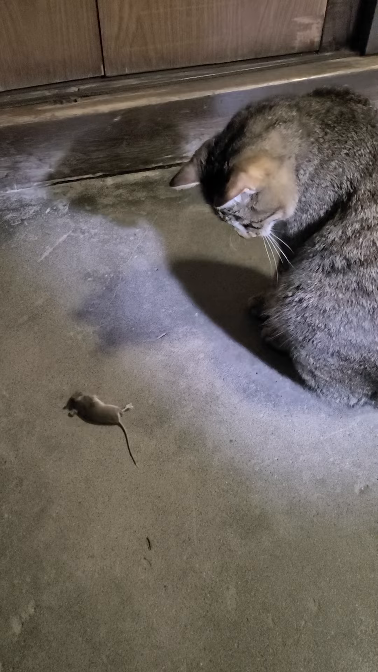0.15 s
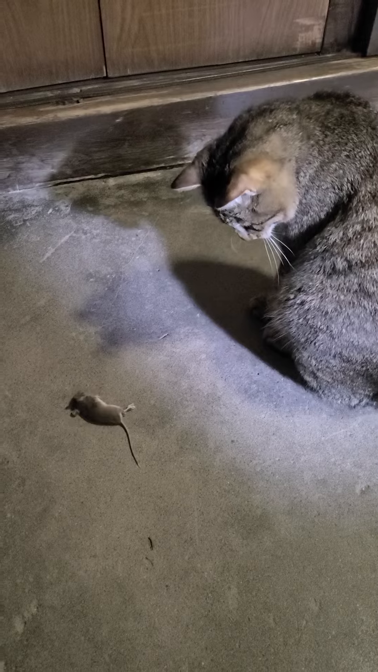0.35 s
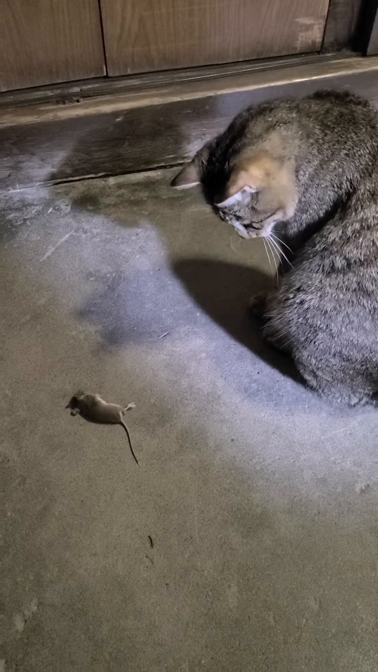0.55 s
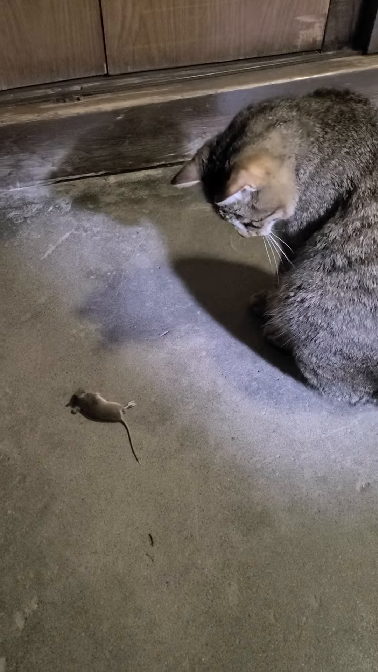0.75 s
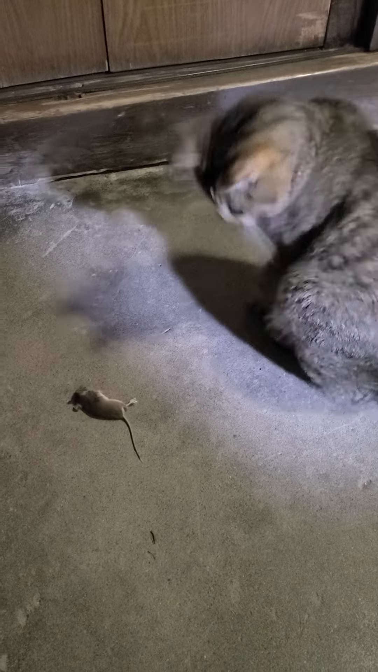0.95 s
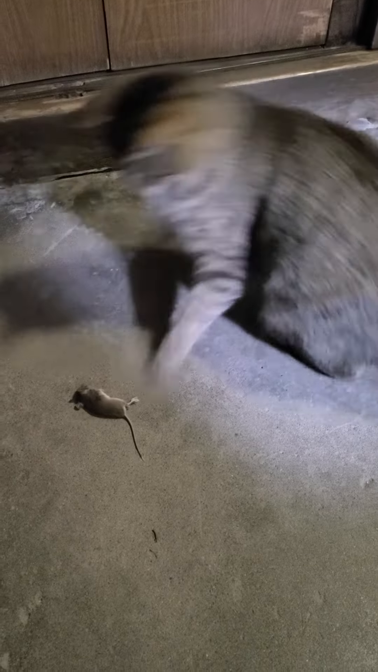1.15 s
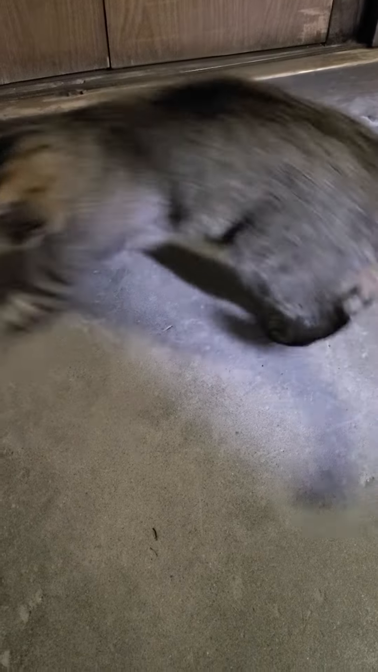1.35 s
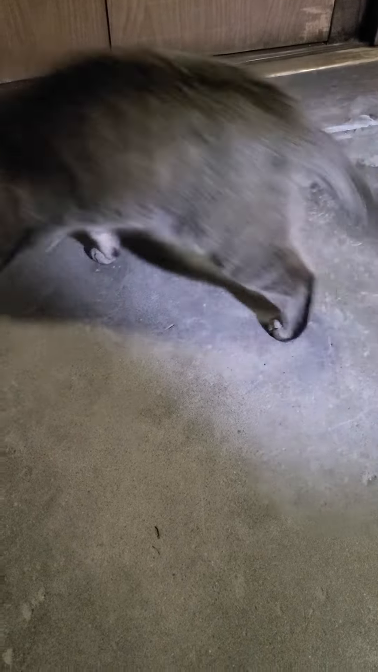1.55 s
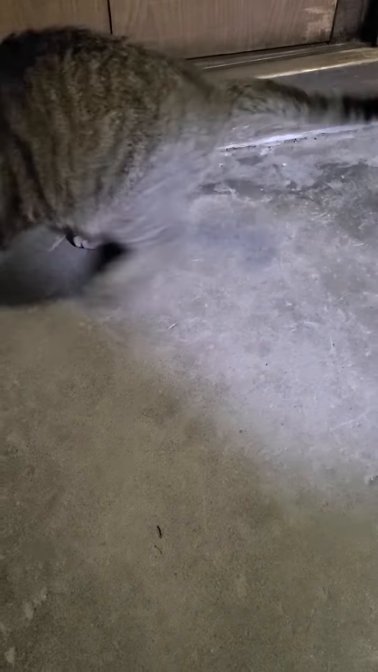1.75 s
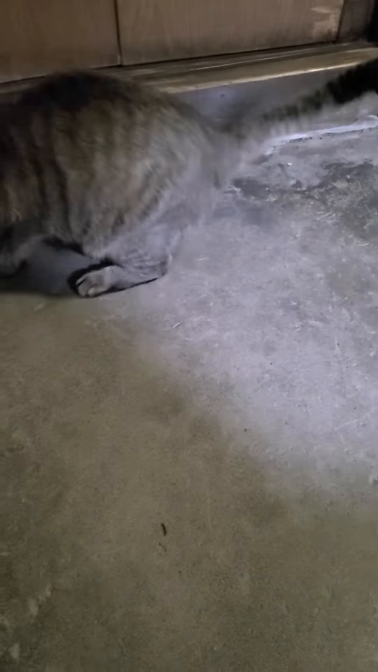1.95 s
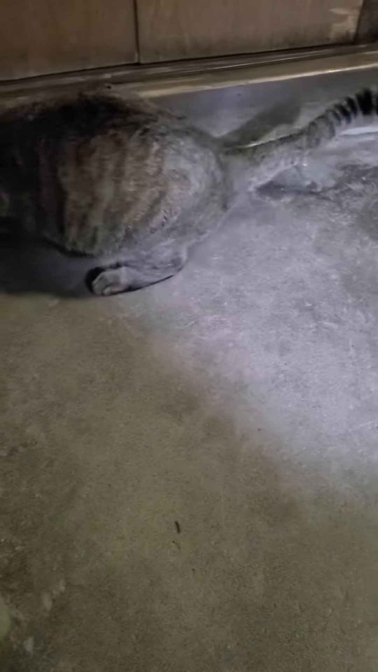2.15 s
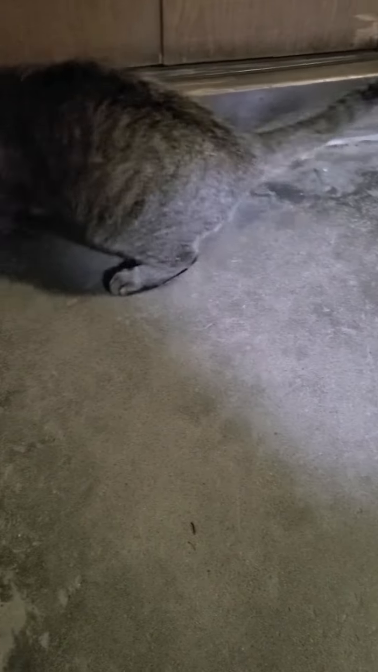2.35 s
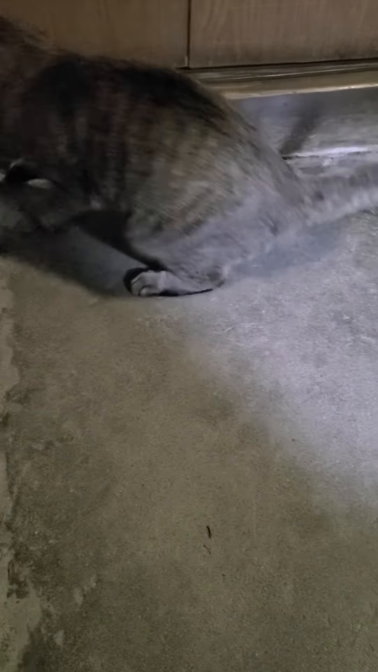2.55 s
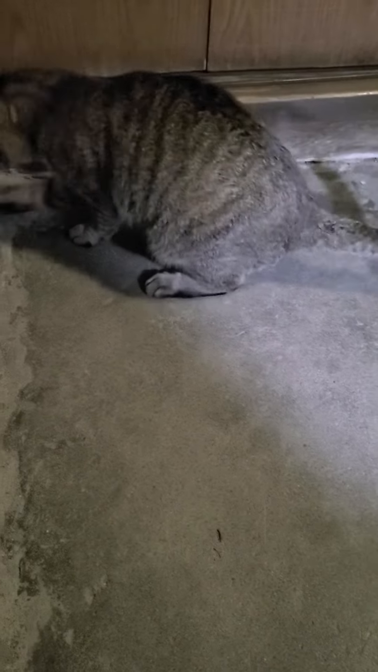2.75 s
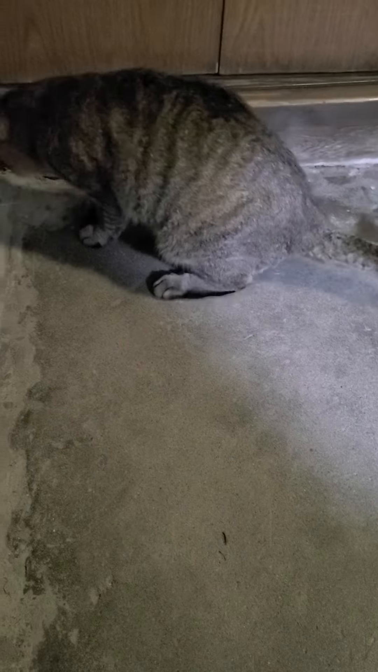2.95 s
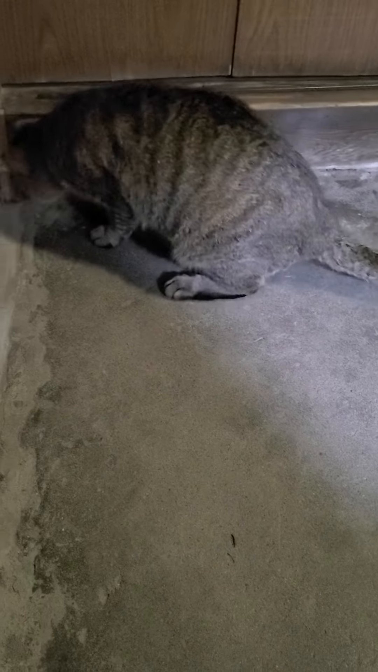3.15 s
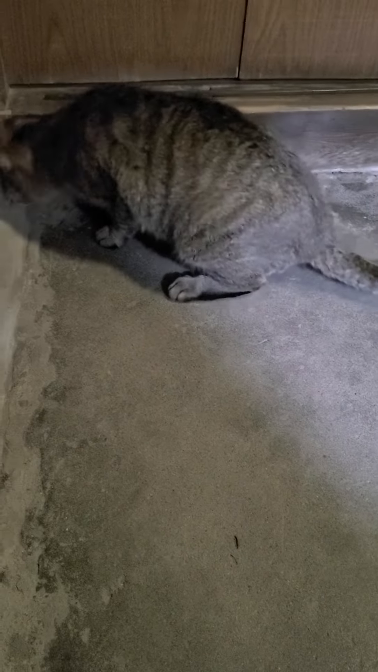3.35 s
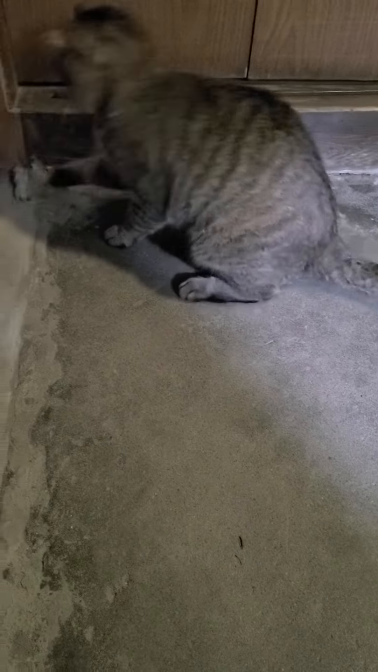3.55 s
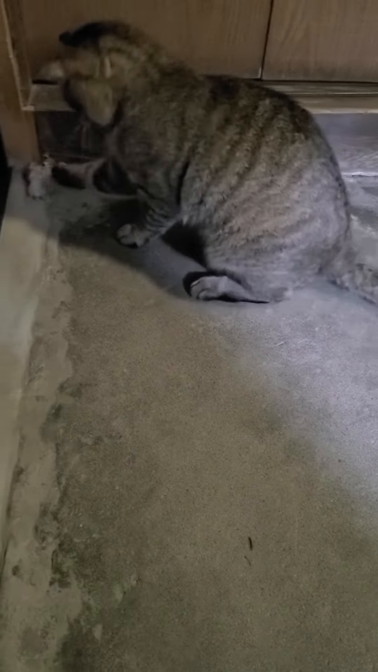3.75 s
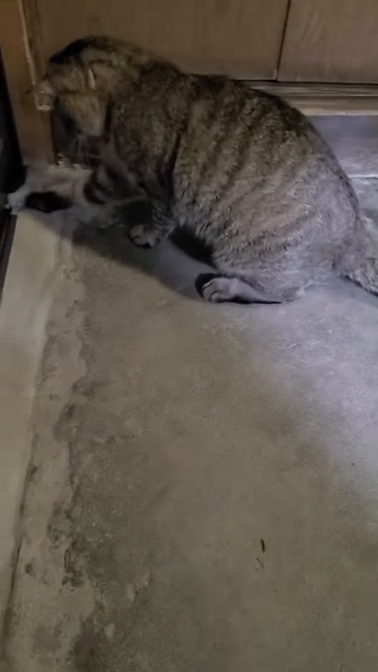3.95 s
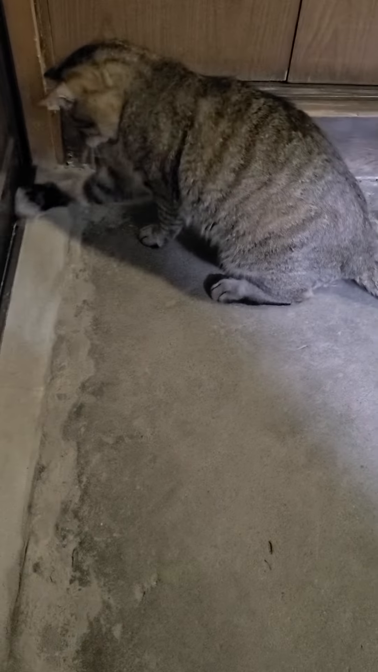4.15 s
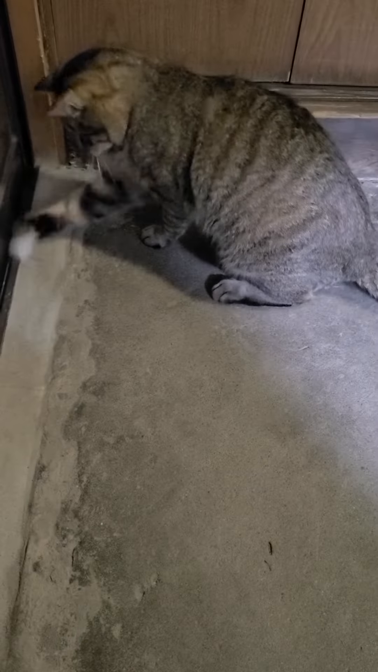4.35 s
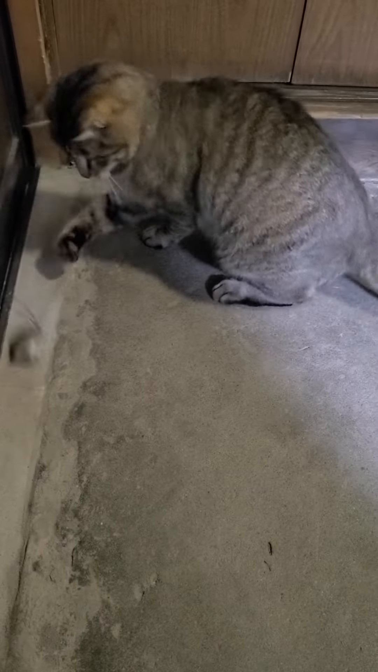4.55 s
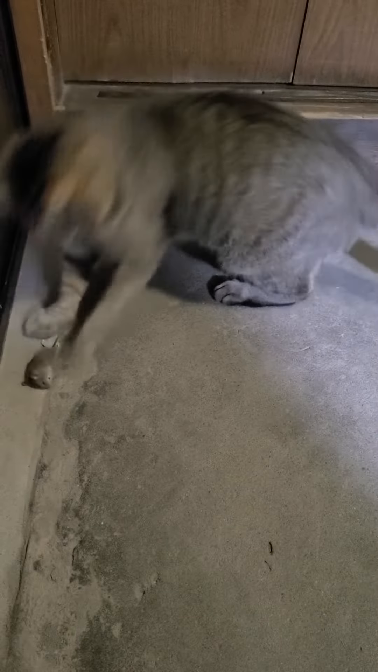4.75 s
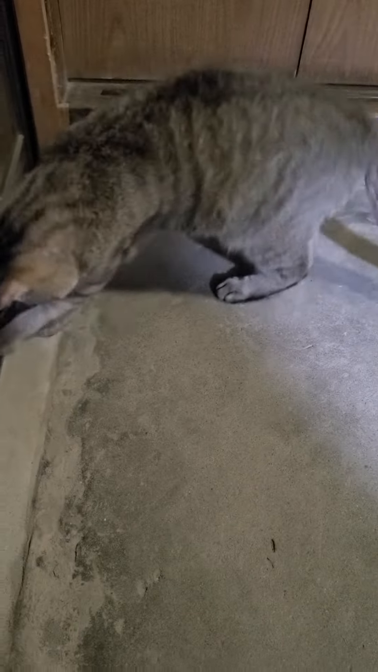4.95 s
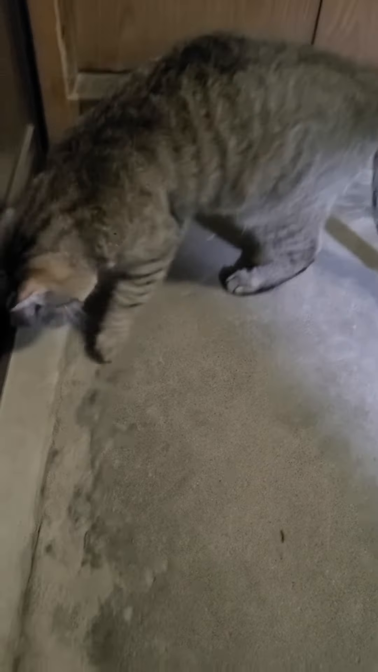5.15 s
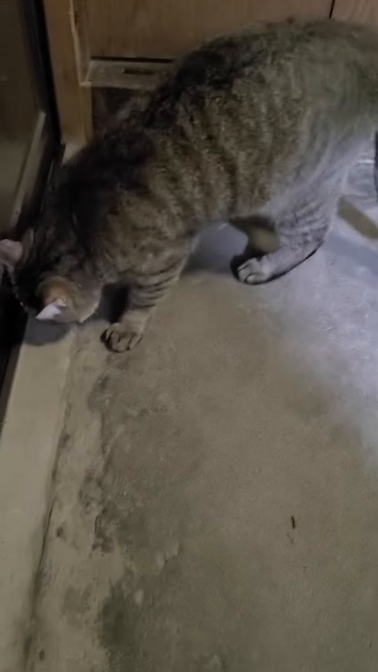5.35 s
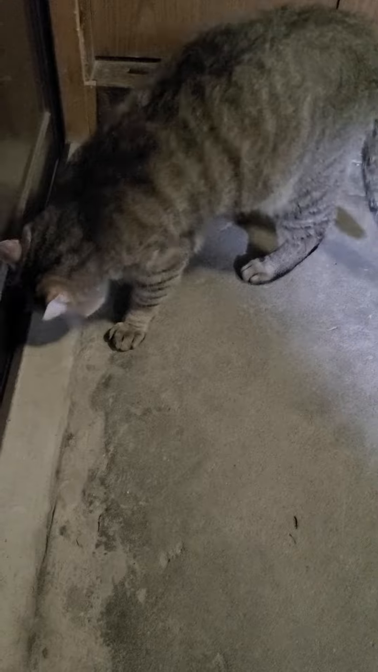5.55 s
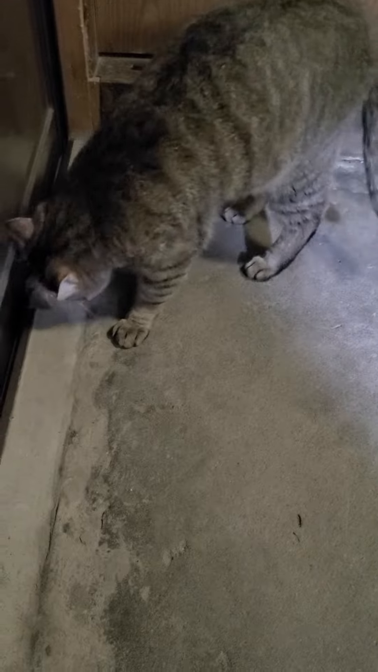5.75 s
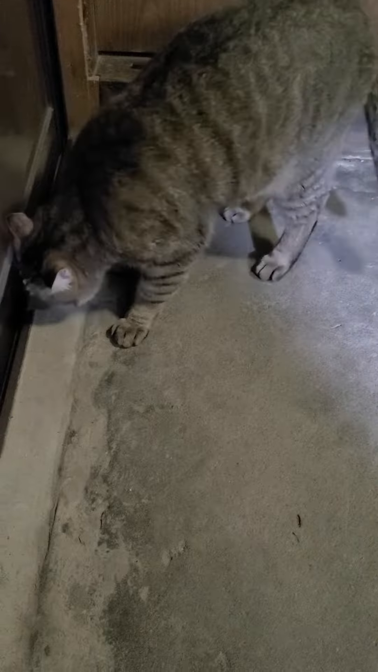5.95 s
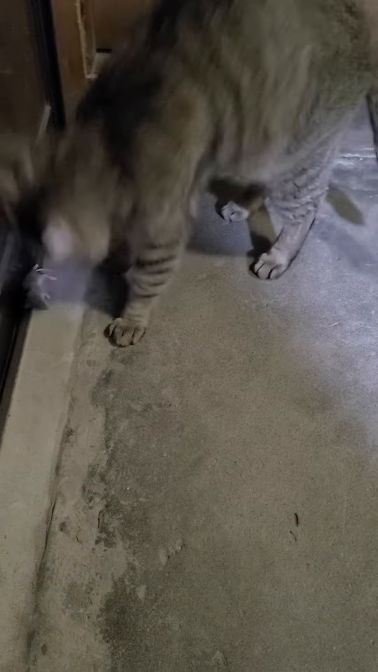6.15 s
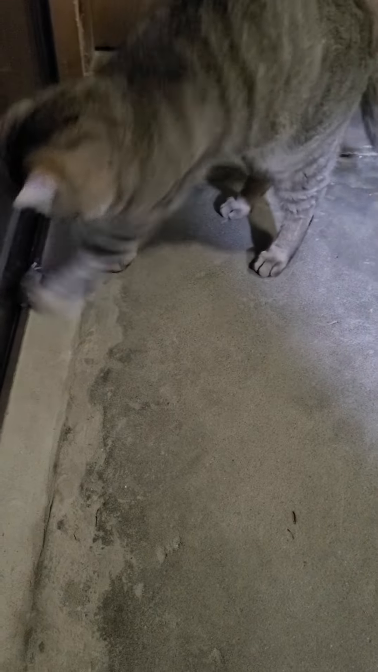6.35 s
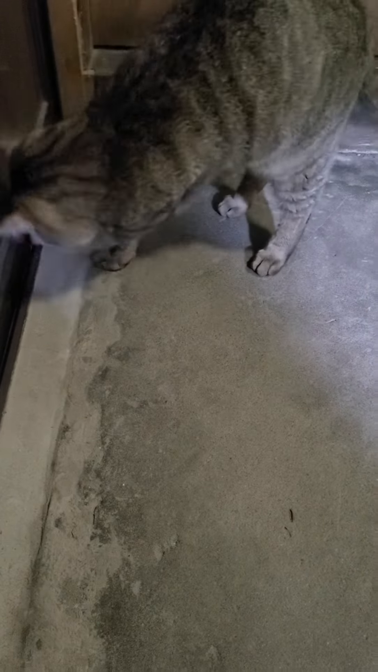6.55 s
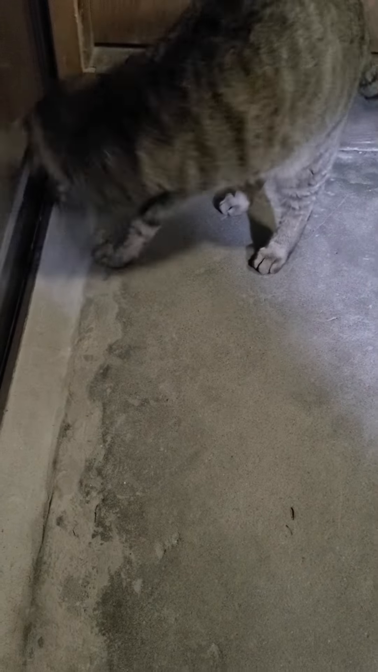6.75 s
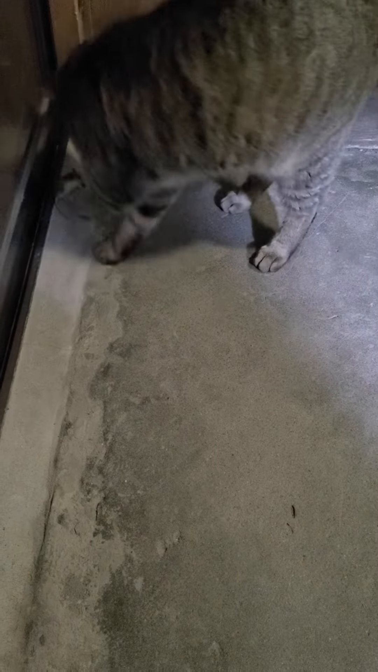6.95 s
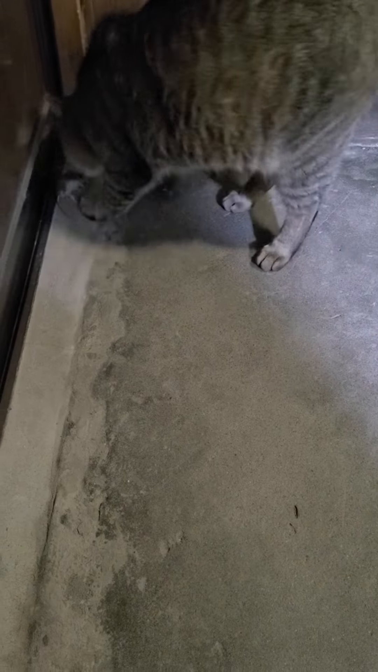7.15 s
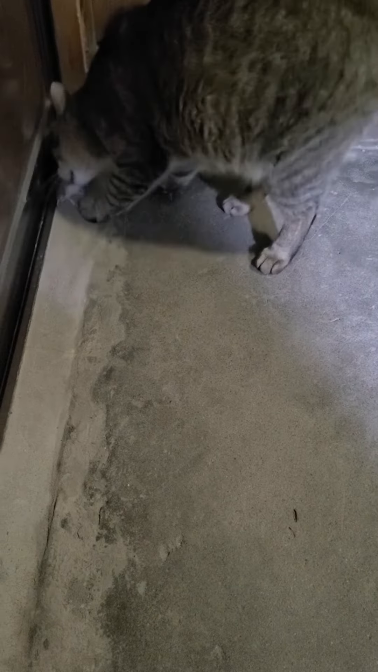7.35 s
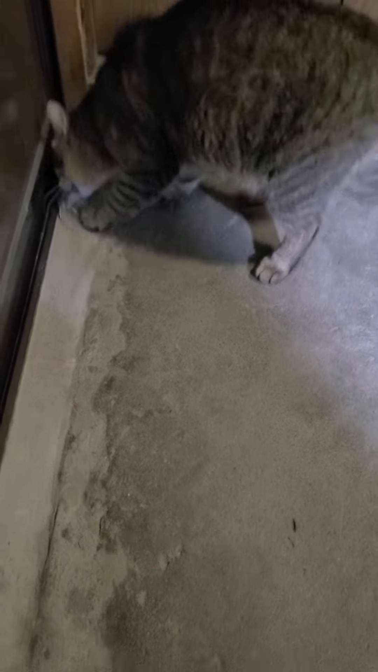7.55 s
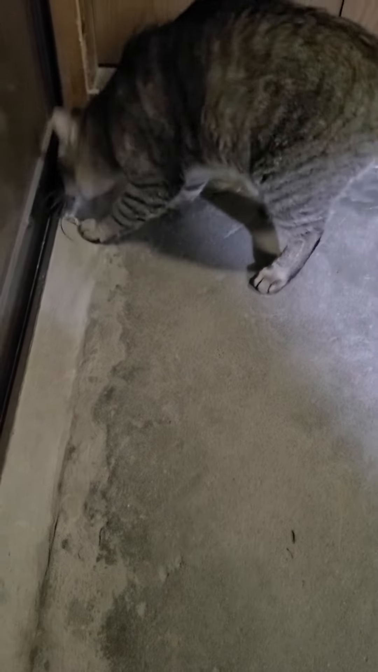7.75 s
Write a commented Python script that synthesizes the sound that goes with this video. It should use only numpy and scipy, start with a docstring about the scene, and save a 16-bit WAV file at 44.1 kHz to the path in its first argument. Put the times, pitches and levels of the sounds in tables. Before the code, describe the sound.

Over a steady low outside rumble and faint hiss, a cat's paws scuff grit and its claws click on concrete close to the microphone. The play comes in short bursts with pauses, as paws and a small object bump wooden furniture and a door and thump the floor. Two knocks stand out, the first hollow and ringing, the second drier, each with a brief room echo. Lighter taps and scrapes finish.

```python
"""A cat bats a small limp object about on a concrete floor at night, between a wooden cabinet and a door.
Paws and fur scuff up grains of grit and claws tick; object and paws set the wood ringing and thump the
floor, which booms in the room's air modes. A short room tail follows the scuffs, ticks and knocks.
Underneath, outside rumble hums in the same modes; a two-port phone microphone colours it all and hisses."""
import sys
import numpy as np
from scipy import signal
from scipy.fft import rfft, irfft, next_fast_len
from scipy.io import wavfile

SR = 44100
rng = np.random.default_rng(int(sys.argv[2]) if len(sys.argv) > 2 else 0)


def put_to_file(sound):
    """Save the sound as 16-bit audio at rate SR, in the file named by the first command-line argument."""
    columns = np.atleast_2d(sound).T  # one column per channel
    safe = np.clip(columns, -1, 1)
    whole_steps = np.round(safe * 32767)
    wavfile.write(sys.argv[1], SR, whole_steps.astype(np.int16))


N = 344272

# scuffs on concrete: t/s, rise/s, hold/s, fall/s, grit level before trim/dB, hiss re grit/dB,
# drag re grit/dB
PAW_SCUFFS = [(1.271, 0.015, 0.034, 0.068, -61.5, -11, -4), (1.313, 0.045, 0.092, 0.079, -51, -3.5, -13.5),
              (1.507, 0.0094, 0.0078, 0.021, -50, -13, 2), (1.531, 0.017, 0.012, 0.049, -56.5, -3.5, -12),
              (1.862, 0.023, 0.011, 0.1, -76.5, -6, -1), (1.95, 0.037, 0.059, 0.18, -59, -4, -4),
              (2.137, 0.0075, 0.0033, 0.018, -49.5, -35, 13), (2.222, 0.017, 0.0055, 0.054, -63, -32, 13.5),
              (2.635, 0.013, 0.029, 0.022, -62, -19, -9), (2.661, 0.028, 0.017, 0.026, -49.5, 2.5, -5.5),
              (2.707, 0.013, 0.0083, 0.031, -57.5, -15, -15), (3.874, 0.058, 0.046, 0.044, -56, -10.5, 1),
              (4.119, 0.026, .005, 0.035, -70.5, -20, -13.5), (4.219, 0.015, 0.0091, 0.07, -76.5, 1.5, -18),
              (4.368, 0.021, .015, 0.049, -68, -5, -4), (4.405, .022, .005, 0.022, -73.5, 7, -9),
              (4.543, .015, 0.07, 0.07, -79, -6, -14), (4.847, 0.016, 0.043, 0.015, -57, -5, 0),
              (4.897, 0.0027, .005, 0.084, -48.5, -8, -9), (6.396, 0.011, 0.028, 0.019, -50, -19, -6.5),
              (6.42, 0.0043, 0.048, 0.11, -59.5, -2.5, -19), (6.744, 0.01, .015, .03, -73.5, -6, -10),
              (7.017, 0.0093, 0.033, .02, -84, -4, -5), (7.549, 0.026, .005, 0.043, -73.5, 1, -1)]
# claw ticks: t/s, ring peak/dB, f/Hz, treble re ring/dB, left minus right/dB
CLAW_TICKS = [(0.23, -56.5, 2770, -30, -3), (0.239, -62, 2380, -30, -16), (1.509, -40.5, 2970, -20, -8),
              (2.105, -37.5, 3300, -11, -5.5), (2.133, -29, 3320, -17, -6.5), (2.652, -69, 2940, -13, 0),
              (2.67, -45.5, 5500, -13, 10), (2.677, -36, 5300, 2.5, -0.5), (2.694, -33, 6160, -18, 4),
              (2.704, -41, 3700, 5, -4), (3.917, -55.5, 2980, -18, -1), (4.534, -60, 1200, -30, -3),
              (4.865, -48, 2260, -21, 4), (4.9, -38, 3400, -5, -9.5), (4.975, -45, 5200, -3.5, -2.5),
              (6.404, -51, 3000, -7, -1), (6.424, -42, 2900, -9, 3), (7.297, -70, 2580, -23, -7),
              (7.508, -74, 3100, -20, -7)]
# hits on cabinet, door and floor: t/s, peak/dB, tilt/(dB per octave); negative tilt is a softer hit
CABINET_HITS = [(1.513, -40, -10), (2.107, -19, -.3), (6.432, -44, -10), (4.198, -27, -13)]
DOOR_HITS = [(1.515, -33, -8.5), (1.55, -44.5, -2), (1.634, -47, -9), (1.985, -41, -7.5),
             (2.25, -43.5, -0.5), (4.198, -55, 9.5), (4.9, -22, -0.5), (4.93, -39, -21),
             (4.975, -40.5, -15.5), (5.125, -56, -6), (5.26, -55.5, -7.5), (6.432, -37.5, -10),
             (6.668, -45, -1)]
FLOOR_HITS = [(1.53, -44, 7), (2.0, -34.5, 5.5), (4.9, -27.5, 2.7), (5.02, -38, -11), (6.432, -34.5, -0.5)]
# how cabinet, door and room air ring when hit: f/Hz, relative level/dB, t60/s
CABINET_MODES = [(198, -3, .1), (232, -2.5, .07), (264, -3, .4), (630, -4, .27), (330, -12, .12),
                 (425, -8, .15), (510, -12, .08), (775, -14, .15), (1180, -10, .05), (1362, -14, .06),
                 (1620, -9, .06)]
DOOR_MODES = [(170.4, 0.5, 0.071), (273.5, 5, 0.034), (306, 7.5, 0.026), (421, -0.5, 0.027),
              (499, -14, 0.19), (568, -7, 0.047), (677, -3, 0.11), (802, -2.5, 0.036), (1046, -9.5, 0.02),
              (1284, -29, 0.13)]
ROOM_MODES = [(41, -7.5, 0.087), (57.96, -0.5, 1), (67.4, 5.5, 0.18), (88, -3, .2), (111.16, -4, 0.65),
              (121.7, -15.5, 1), (196.03, -14.5, 0.77)]
# decay of the room tail: f/Hz, t60/s
TAIL_DECAY = [(100, .4), (500, .33), (3000, .28), (8000, .22), (15000, .22)]
# rumble in each room mode: relative level/dB
RUMBLE_MODE_MIX = [-13, -7, 0.5, -10.5, 4, -5.5, -9]
# tone of the deep rumble, the upper rumble and the air with its hiss: f/Hz, relative density/dB
DEEP_SPECTRUM = [(12, -43), (22, -15), (40, 0.5), (70, 4.5), (140, -4), (200, -7.5), (300, -56.5)]
UPPER_SPECTRUM = [(140, -22), (180, -15.5), (270, -3), (370, 2.5), (500, -12.5), (800, -46)]
AIR_SPECTRUM = [(300, -24.5), (500, 7), (800, 1.5), (1150, 0), (1600, -3.5), (2500, -5), (3300, -7.5),
                (5000, -12.5), (7500, -27), (10000, -37), (11000, -15.5), (14000, -9), (17000, -16)]
# fader ride on the upper rumble: t/s, level/dB
UPPER_RIDE = [(0, -77), (.5, -79), (.65, -69.5), (1, -79.5), (1.5, -74), (2.6, -70.5), (3.45, -82),
              (3.8, -75.5), (4.6, -80.5), (5.8, -77), (6.2, -75.5), (7.2, -77), (7.5, -68), (7.81, -78.5)]
# where the air and hiss lean: f/Hz, left minus right/dB
AIR_PAN = [(500, -3.5), (1500, -8), (2500, -6), (4000, -3), (8000, 8.5), (12000, 4.5)]
# stereo image of the beds and the tail: f/Hz, left-right correlation
STEREO_CORRELATION = [(30, 0.99), (130, 0.99), (290, 0.77), (640, 0.19), (1400, 0.035), (3000, 0.01)]
# peaks and dips of the microphone ports, left then right: f/Hz, width/Hz, gain/dB
PORT_EQ = ([(1200, 250, 4), (3050, 500, 5), (5500, 500, 5), (6700, 1200, -5), (11000, 6000, 3)],
           [(1200, 250, 4), (2700, 300, 3), (3350, 450, 10), (5500, 500, 6), (6800, 900, -14),
           (11000, 6000, -2)])


def paw_scuffs():
    """Dense grit grains of uneven size, clumped as the paw slips and sticks; scuffs rise, hold, fall."""
    swing_db, grains_per_s, trim_db = 29.5, 7000, -3
    grit_gain, hiss_gain, drag_gain = np.zeros((3, N))
    for s, rise, hold, fall, db, hiss_db, drag_db in PAW_SCUFFS:
        corners = s + np.cumsum([0, rise, hold, fall])
        at = np.arange(round(s * SR), min(round(corners[-1] * SR), N))
        level = amp(db + swing_db * np.interp(at / SR, corners, [-1, 0, 0, -1]))
        grit_gain[at] += level
        hiss_gain[at] += level * amp(hiss_db)
        drag_gain[at] += level * amp(drag_db)
    clumps = amp(2.5 * rms_one(band(rng.standard_normal(N), 20, 150)))
    sizes = amp(2.5 * np.minimum(rng.exponential(1, (2, N)), 4))
    triggers = rng.random((2, N)) < grains_per_s / SR
    grains = triggers * sizes * rng.choice([-1, 1], (2, N)) * clumps
    grit = grit_gain * rms_one(band(grains, 1470, 4530))
    hiss = hiss_gain * rms_one(band(grains, 7600, 14000))
    drag = drag_gain * rms_one(band(grains, 740, 1950))
    return amp(trim_db) * (grit + hiss + drag)


def claw_ticks():
    """A claw tip lands: a short ring and a burst of treble a few milliseconds long."""
    size, t60_s, attack_samples = 2000, .018, 60
    out = np.zeros((2, N + size))
    envelope = amp(-60 * np.arange(size) / SR / t60_s) * np.clip(np.arange(size) / attack_samples, 0, 1)
    for s, db, hz, treble_db, pan_db in CLAW_TICKS:
        burst = rng.standard_normal((2, size)) * envelope
        tone = peak_one(band(burst, hz / 1.21, hz * 1.21))
        snap = amp(treble_db) * peak_one(band(burst, 7000, 14000))
        at = round(s * SR)
        out[:, at:at + size] += amp(db + pan_db * np.array([[.5], [-.5]])) * (tone + snap)
    return out[:, :N]


def struck(hits, modes, pivot_hz, spread_db):
    """Hits ring every mode, soft ones starving the top. Gives the full ring and its attack, both mono."""
    size, attack_t60_s = SR * 5 // 8, 0.064
    out = np.zeros((2, N + SR))
    scatter_db = rng.normal(0, spread_db, (len(hits), len(modes)))
    click = signal.unit_impulse(size)
    # neighbouring modes swing in opposite polarity
    rings = [-(-1) ** k * ring(click, hz, t60) for k, (hz, _, t60) in enumerate(modes)]
    attack_fade = amp(-60 * np.arange(size) / SR / attack_t60_s)
    for (s, peak_db, tilt), offsets_db in zip(hits, scatter_db):
        body = sum(amp(db + tilt * np.log2(hz / pivot_hz) + offset_db) * tone
                   for (hz, db, _), offset_db, tone in zip(modes, offsets_db, rings))
        contact_hz = 10 * pivot_hz * amp(min(tilt, 0))  # a softer contact lasts longer and sounds duller
        pole = np.exp(-2 * np.pi * contact_hz / SR)
        body = amp(peak_db) * peak_one(signal.lfilter([1], [1, -2 * pole, pole * pole], body))
        at = round(s * SR)
        out[:, at:at + size] += [body, body * attack_fade]
    return out[:, :N]


def cabinet_knocks():
    """Object or paw knocks the cabinet, and its wood rings low and hollow."""
    return struck(CABINET_HITS, CABINET_MODES, pivot_hz=260, spread_db=1.0)


def door_knocks():
    """Blows on the door: a drier knock, its strongest modes dying fast."""
    return struck(DOOR_HITS, DOOR_MODES, pivot_hz=400, spread_db=2.5)


def floor_thumps():
    """Weight landing on the floor sets the room's air modes booming."""
    return struck(FLOOR_HITS, ROOM_MODES, pivot_hz=90, spread_db=1.5)[0]


def room_tail(send):
    """Diffuse reverb: noise that dies octave by octave, fading in from the first reflection."""
    size, predelay_s, fade_in_s = SR // 2, 0.0059, 0.0033
    t = np.arange(size) / SR
    white = irfft(stereo_noise(size)[1], size)
    tail = sum(band(white, hz / np.sqrt(2), hz * np.sqrt(2)) * amp(-60 * t / at_hz(TAIL_DECAY, hz))
               for hz in 125 * 2. ** np.arange(8))
    tail *= np.clip((t - predelay_s) / fade_in_s, 0, 1)
    tail /= np.sqrt(np.sum(tail ** 2) / 2)
    return signal.fftconvolve(send, tail, axes=1)[:, :N]


def outside_rumble():
    """Low bed from outside: steady noise humming in the air modes, a broad floor, a drifting upper band."""
    deep_db, broad_re_hum_db = -49.5, -8
    drive = coloured([(20, -2.5), (300, 1.5), (400, -32)])
    hum = sum(amp(db) * rms_one(ring(drive, hz, t60))
              for (hz, _, t60), db in zip(ROOM_MODES, RUMBLE_MODE_MIX))
    deep = rms_one(rms_one(hum) + amp(broad_re_hum_db) * coloured(DEEP_SPECTRUM))
    upper_db = np.interp(np.arange(N) / SR, *np.transpose(UPPER_RIDE))
    return amp(deep_db) * deep + amp(upper_db) * coloured(UPPER_SPECTRUM)


def air_and_hiss():
    """Faint steady room air and microphone hiss, mids leaning right and highs left."""
    return amp(-77.5) * coloured(AIR_SPECTRUM, AIR_PAN)


def coloured(spectrum, pan=((20, 0), (20000, 0))):
    """Steady stereo noise of a given spectrum and pan, rms 1."""
    size = next_fast_len(N)
    hz, pair = stereo_noise(size)
    level_db = at_hz(spectrum, hz) + at_hz(pan, hz) * [[.5], [-.5]]
    return rms_one(irfft(pair * amp(level_db), size)[:, :N])


def stereo_noise(size):
    """Frequencies and spectra of two white noises, centred in the bass, wide in the treble."""
    hz = np.fft.rfftfreq(size, 1 / SR)
    mid, side = rfft(rng.standard_normal((2, size)))
    alike = at_hz(STEREO_CORRELATION, hz)
    return hz, np.sqrt((1 + alike) / 2) * mid + np.sqrt((1 - alike) / 2) * side * [[1], [-1]]


def ring(x, hz, t60):
    """One resonant mode: a click sets a dying sine ringing."""
    r, w = amp(-60 / (t60 * SR)), 2 * np.pi * hz / SR
    return signal.lfilter([0, np.sin(w)], [1, -2 * r * np.cos(w), r * r], x + 1e-18)


def band(x, low_hz, high_hz):
    """Band-pass."""
    sos = signal.butter(2, [low_hz, min(high_hz, .45 * SR)], "band", fs=SR, output="sos")
    return signal.sosfilt(sos, x + 1e-18)


def at_hz(points, hz):
    """Read a curve on a log-frequency axis."""
    corners_hz, values = np.transpose(points)
    return np.interp(np.log(np.maximum(hz, 1)), np.log(corners_hz), values)


def amp(db):
    """Decibels to gain."""
    return 10 ** (np.asarray(db) / 20)


def rms_one(x):
    """Scale to unit rms."""
    return x / np.sqrt(np.mean(x ** 2) + 1e-20)


def peak_one(x):
    """Scale each channel to unit peak."""
    return x / np.abs(x).max(-1, keepdims=True)


def scene():
    """The mix: the cat's play up close, its room tail behind, rumble and air underneath."""
    cabinet, cabinet_attack = cabinet_knocks()
    door, door_attack = door_knocks()
    hits = (cabinet + door + floor_thumps()) * amp([[-.15], [.15]])  # a hair to the right
    paws, claws = paw_scuffs(), claw_ticks()
    # the loud start of a knock is what fills the room
    send = amp(3) * cabinet_attack + amp(6) * door_attack + amp(-8) * claws + amp(-3) * paws
    return paws + claws + hits + room_tail(send) + outside_rumble() + air_and_hiss()


def record(dry):
    """Each microphone port adds its own peaks and notch; a steep low-pass cuts the top."""
    cutoff_hz = 15780
    channels = []
    for x, bells in zip(dry, PORT_EQ):
        for hz, width_hz, db in bells:
            gain, width = amp(db / 2), np.tan(np.pi * width_hz / SR)
            centre = -2 * np.cos(2 * np.pi * hz / SR)
            x = signal.lfilter([1 + width * gain, centre, 1 - width * gain],
                               [1 + width / gain, centre, 1 - width / gain], x)
        channels.append(x)
    return signal.sosfilt(signal.ellip(12, .3, 70, cutoff_hz, fs=SR, output="sos"), np.array(channels))


dry = scene()
out = record(dry)
put_to_file(out)
```